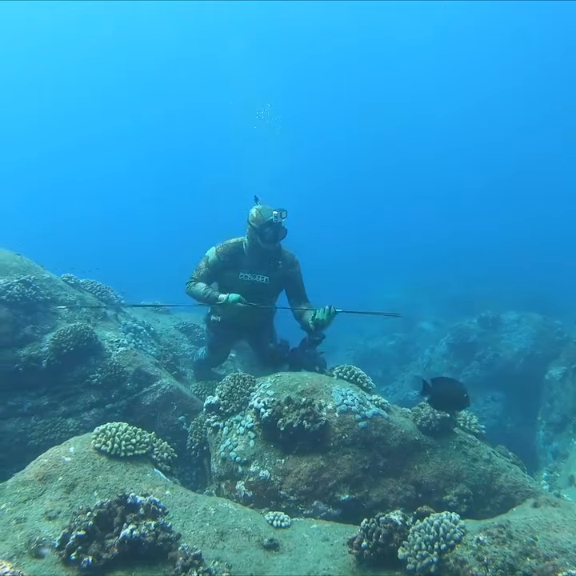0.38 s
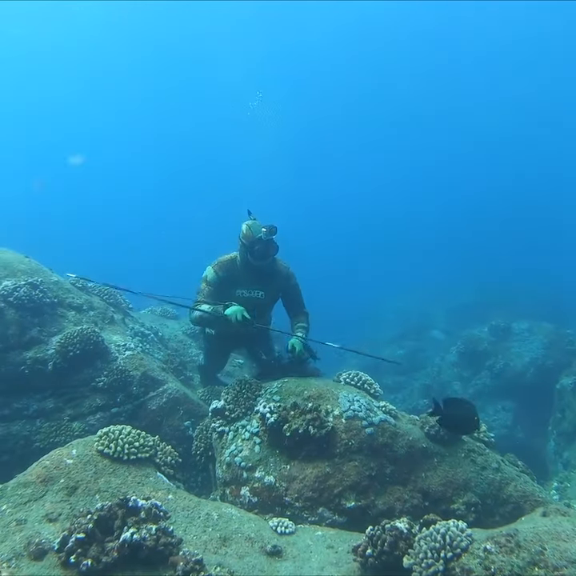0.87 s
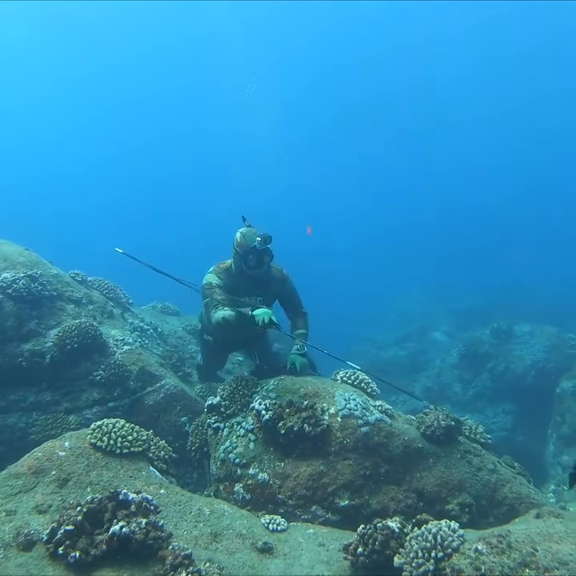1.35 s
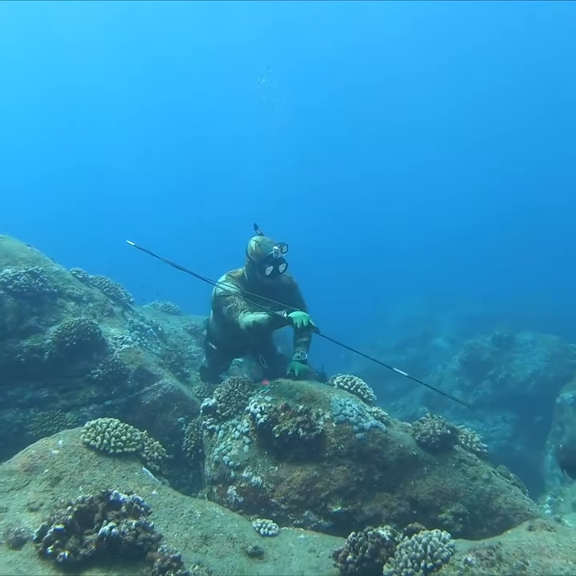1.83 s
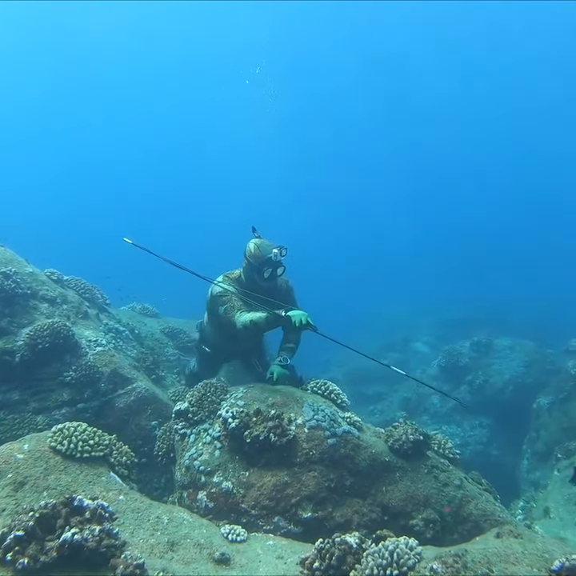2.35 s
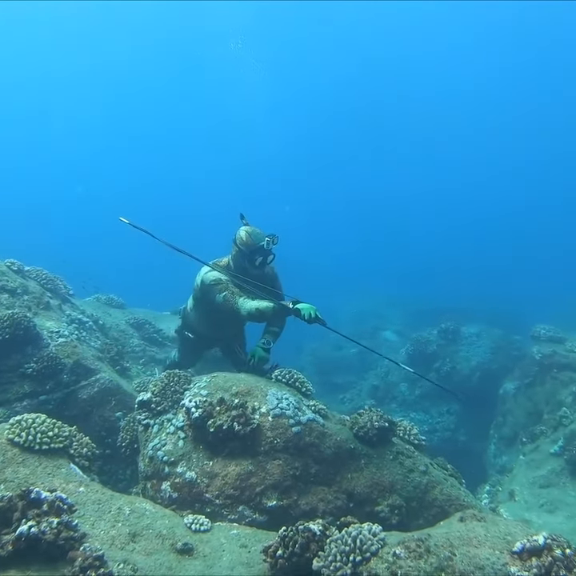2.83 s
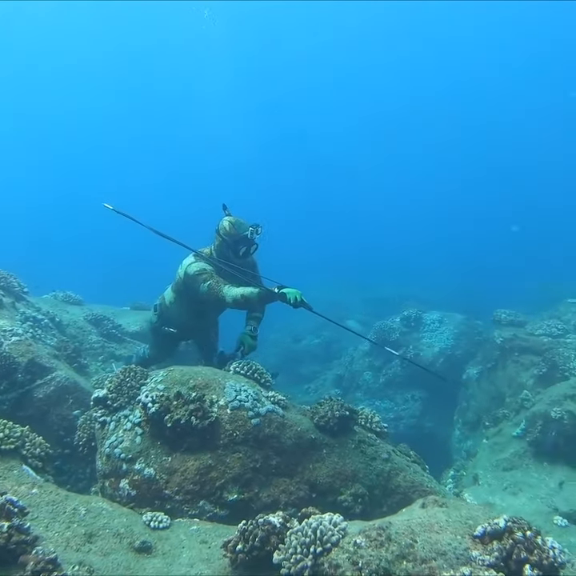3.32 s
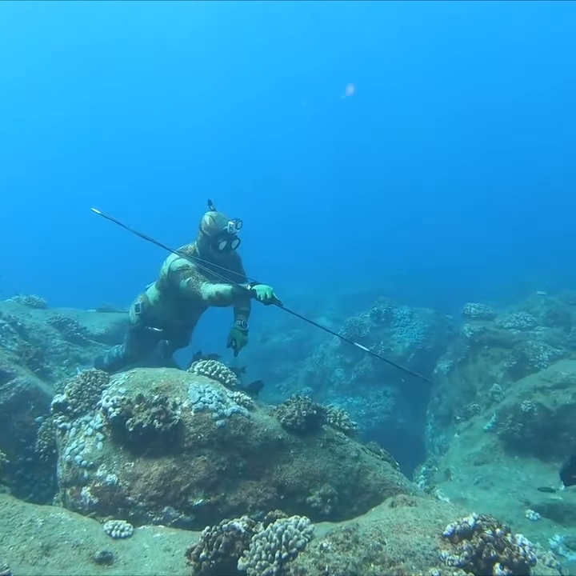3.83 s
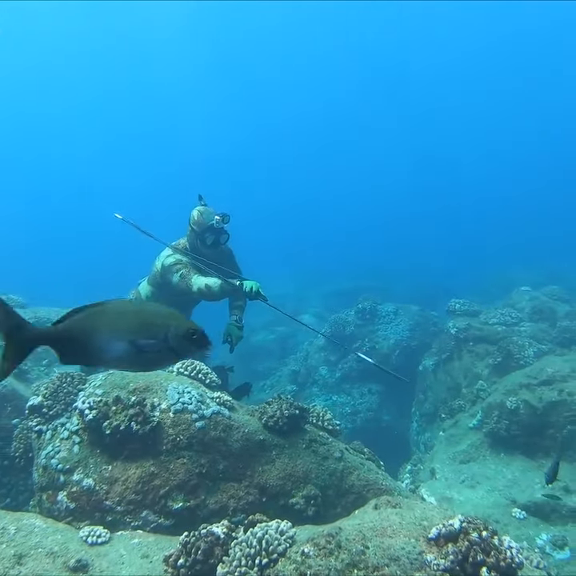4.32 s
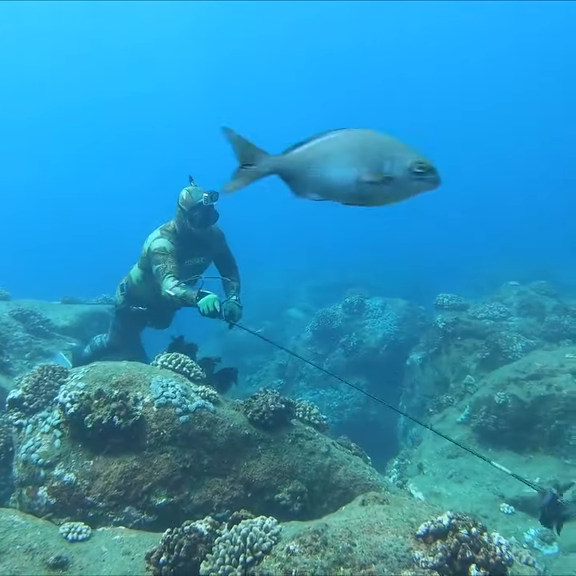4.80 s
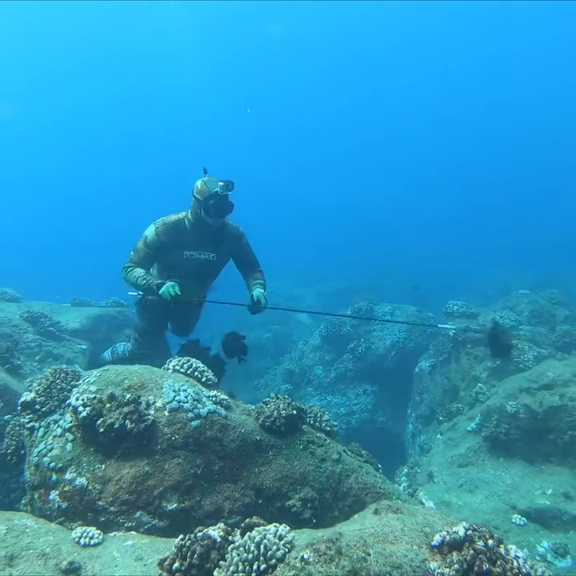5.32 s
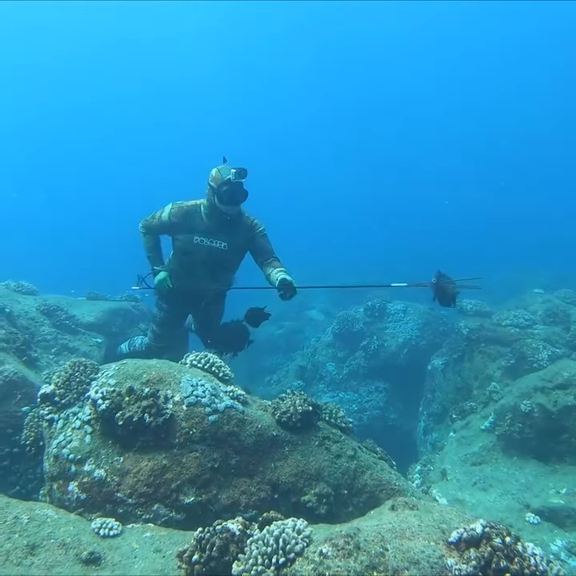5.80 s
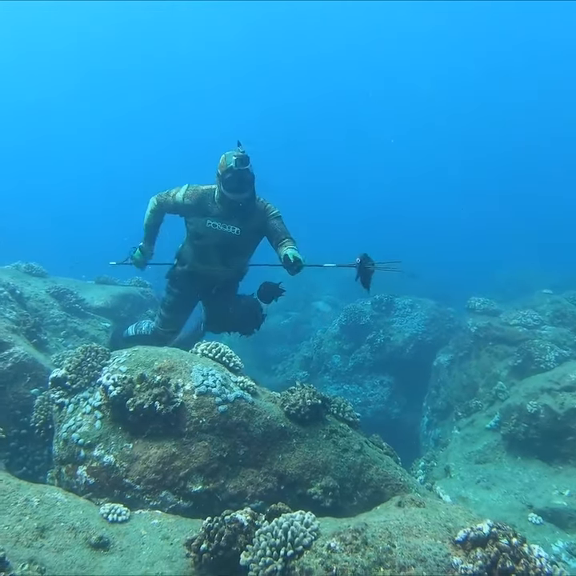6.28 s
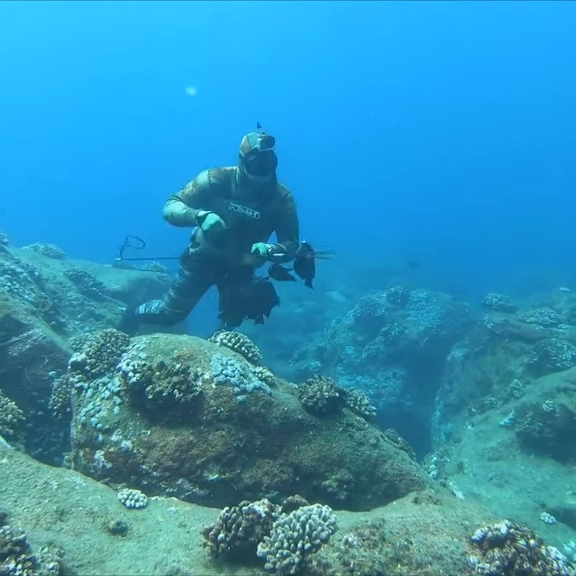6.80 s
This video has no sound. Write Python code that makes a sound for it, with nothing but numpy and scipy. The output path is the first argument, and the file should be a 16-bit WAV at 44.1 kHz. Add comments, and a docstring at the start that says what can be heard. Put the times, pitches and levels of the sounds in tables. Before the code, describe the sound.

Stereo underwater sound on a rocky reef, heard through a sealed, resonant camera housing. From 0 s a wavering hiss of distant snapping shrimp carries dense, clumpy crackle, with sharper clicks, one bright at 0.4 s, over a weak, lumpy water rumble. Dull hollow knocks of gear and rock come around 0.9 to 1.15 s, 2.1 to 2.6 s and 3.4 s, with small pops and low thumps between; a thump swells near 3.25 s. At about 4.5 s the spear is let go: a hard, woody triple slap within 0.02 s, stronger on the right, followed by deep thumps and a strong snap near 4.66 s, with short rock echoes. Everything suddenly ducks, treble most briefly, then recovers over roughly two seconds. Crackle returns as subdued knocks and thumps cluster at 5.1 to 5.6 s, with others around 6.1, 6.3 and 6.8 s.

```python
"""Reef from a sealed housing

Under water, heard through two microphone ports of a camera housing. Shrimp crackle (noise and
filtered clicks) rings the housing modes; gear knocks, water thumps and pops are short tone bursts
with rock echoes, over a band-noise surge. A pole spear is let go with a sharp triple slap and the
gain control ducks everything, then slowly recovers."""
import sys
import numpy as np
from scipy import signal
from scipy.fft import rfft, irfft, next_fast_len
from scipy.io import wavfile

SR = 44100
rng = np.random.default_rng(int(sys.argv[2]) if len(sys.argv) > 2 else 0)


def to_linear_factor(level_db):
    """Convert decibel levels (scalar or array-like) to linear amplitude factors."""
    exponent = np.asarray(level_db, float) / 20
    return 10 ** exponent


def transcribe(signal):
    """Save signal, clipped to [-1, 1], as a 16-bit WAV file at the path in sys.argv[1]."""
    frames = np.atleast_2d(signal).T
    limited = np.clip(frames, -1, 1)
    pcm = np.round(limited * 32767).astype(np.int16)
    wavfile.write(sys.argv[1], SR, pcm)


N = 304731
DIRECTIONS, PLACES = 8, 4  # of the shrimp, of the blows: each has its own echoes


def evened(x):
    """Scale to unit rms."""
    return x / np.sqrt(np.mean(x ** 2))


def add(mix, start_s, sound):
    """Mix a sound in from start_s, cut at the end."""
    part = mix[..., round(start_s * SR):][..., :sound.shape[-1]]
    part += sound[..., :part.shape[-1]]


def band(x, order, low_hz, high_hz):
    """Butterworth band-pass."""
    return signal.sosfilt(signal.butter(order, [low_hz, high_hz], "band", fs=SR, output="sos"), x)


def wander(size, top_hz):
    """Slow chance: unit-rms noise, falling off above top_hz."""
    n = next_fast_len(N)
    spectrum = rfft(rng.standard_normal((size, n)))
    rolloff = 1 + (np.fft.rfftfreq(n, 1 / SR) / top_hz) ** 2
    return evened(irfft(spectrum / rolloff, n)[:, :N])


def burst(out, peak_s, level_db, hz, cycles):
    """A few cycles that swell, peak at peak_s and die a little slower."""
    rise_s = cycles / hz / 1.49
    u = np.arange(3 * rise_s * SR) / SR / rise_s  # 1 at the peak
    envelope = (u * np.exp(1 - u)) ** 8
    tone = np.cos(2 * np.pi * hz * rise_s * (u - 1))
    add(out, peak_s - rise_s, to_linear_factor(level_db) * envelope * tone)


# housing modes: (frequency [Hz], width [Hz], left level [dB], right level [dB],
# right phase [rad], scatter with direction [0-1])
HOUSING_MODES = [(555, 181, -15, -9.5, -0.05, 0.86), (710, 131, -10.5, -2, -0.04, 0),
                 (830, 116, -15, -5, 1, 0.1), (1021, 96, -11.5, -10.5, -3, 0.58),
                 (1431, 115, -7.5, -28.5, 2, 0.5), (1568, 114, -23, -10, -0.5, 0),
                 (1780, 127, -13, -11, -1.35, 1), (2154, 180, -11.5, -9.5, 3.5, 0.01),
                 (2607, 295, -6.5, -4.5, 0, 0.41), (3133, 1010, -8, -8, 0.0453, 0.22),
                 (3970, 1580, -18.5, -21.5, 0.15, 0.39), (5030, 650, -14, -16, -2.5, 0.52),
                 (5715, 650, -14, -15, -0.2, 0.5), (7024, 780, -17, -25.5, 0.1, 0.43),
                 (7190, 760, -19, -18, 0.5, 0.84), (8260, 1780, -23.5, -21.5, -0.36, 0.57),
                 (9900, 1800, -34.5, -29.5, 2.5, 0.63), (10100, 400, -24.5, -23.5, 3.5, 1),
                 (14400, 8500, -32.5, -42, -1.5, 0.17)]


def housing():
    """Response at both ports for each direction: the same modes, driven a little differently."""
    hz, width_hz, left_db, right_db, phase_rad, scatter = np.transpose(HOUSING_MODES)[..., None]
    modes = len(HOUSING_MODES)
    t = np.arange(2048) / SR
    a, b = rng.standard_normal((DIRECTIONS, 2, modes, 2, 1)).transpose(3, 0, 1, 2, 4)
    varied = 1 + scatter * (a + 1j * b)
    varied /= np.sqrt(np.mean(abs(varied) ** 2, 0))  # over all directions each mode keeps its strength
    drive = np.array([to_linear_factor(left_db), to_linear_factor(right_db) * np.exp(1j * phase_rad)]) * varied
    alternate = (-1) ** np.arange(modes)[:, None]  # neighbours in opposite sign leave no deep notch
    decay = np.exp((2j * np.pi * hz - np.pi * abs(width_hz)) * t)
    rings = (alternate * drive * width_hz * decay).imag.sum(2)
    # a stiff shell passes no bass
    rings = signal.sosfilt(signal.butter(4, 450, "high", fs=SR, output="sos"), rings)
    return rings / abs(rings.mean(1)).max(1)[:, None, None]


# echo decay off rock: (frequency [Hz], t60 [s])
REEF_DECAY = [(700, 0.16), (3000, 0.071), (10000, 0.027)]


def reef(x, tails, wet_db):
    """Echoes: random taps, each band dying at its own speed."""
    hz, t, taps = signal.stft(rng.standard_normal((tails, 8192)), SR, nperseg=128)
    decay_hz, decay_s = np.transpose(REEF_DECAY)
    t60_s = np.interp(np.log(hz + 1), np.log(decay_hz), decay_s)
    tail = signal.istft(taps * to_linear_factor(-60 * t / t60_s[:, None]), SR, nperseg=128)[1]
    tail[:, :round(.003 * SR)] = 0  # the nearest rock is a few metres off
    tail *= to_linear_factor(wet_db) / np.linalg.norm(tail, axis=1, keepdims=True)
    return x + signal.oaconvolve(x, tail, axes=1)[:, :N]


# swells of the far reef above its calm: (time of peak [s], level [dB])
SWELLS = [(0.0, 6.4), (0.3, 4.2), (0.54, 3.4), (1.308, 7.7), (2.14, 5.1), (2.55, 1.2), (2.9, 3.3),
          (3.13, 4.2), (3.66, 3.9), (4.35, 4.4), (4.68, 2.2), (4.95, 6.6), (5.25, 6.5), (5.62, 6.5),
          (6.0, 4.6), (6.32, 4.4), (6.9, 2.6)]


def far_shrimp(calm_db=-34.5, flurry_s=0.081, hiss_db=-13, flicker_db=3.5,
               crackle_db=2.0, per_s=110, spread_db=4.5, clump=.9, smear_s=0.001,
               band_ratio=2.38, dull_hz=1500, bright_hz=11000, bright_db=-3):
    """Countless far snaps merge to a hiss; nearer ones crackle in clumps, each direction in its own band."""
    t = np.arange(N) / SR
    swell_db = sum(db * np.exp(-((t - s) / flurry_s) ** 2 / 2) for s, db in SWELLS)
    busy = to_linear_factor(calm_db + swell_db)
    hiss = rng.standard_normal((DIRECTIONS, N)) * to_linear_factor(hiss_db + flicker_db * wander(DIRECTIONS, 42))

    fires = rng.random((DIRECTIONS, N)) < per_s / SR * np.exp(clump * wander(1, 8))
    size = to_linear_factor(spread_db * np.minimum(rng.exponential(1, fires.shape), 3.5))
    clicks = evened(fires * size * rng.choice([-1., 1.], fires.shape))
    # scattered on the way, a click arrives spread out
    smear = rng.standard_normal((DIRECTIONS, 300)) * np.hanning(300)
    smear *= np.exp(-np.arange(300) / SR / smear_s)
    clicks = evened(signal.oaconvolve(clicks, smear, axes=1)[:, :N])

    edges_hz = np.geomspace(dull_hz, bright_hz, DIRECTIONS)
    crackle = np.array([band(c, 2, hz / band_ratio, hz) for hz, c in zip(edges_hz, clicks)])
    tilt_db = np.linspace(0, bright_db, DIRECTIONS)[:, None]
    return busy * (hiss + to_linear_factor(crackle_db + tilt_db) * crackle)


def surge(rumble_db=-61, top_hz=75, sway_db=-60.5, sway_hz=175, width_hz=45, lumpy_db=6, apart_db=-10):
    """Lumpy rumble of water moving round the housing, which sways on its mount; nearly alike at both ports."""
    shared = rng.standard_normal((2, 1, N))
    push, swing = shared + to_linear_factor(apart_db) * rng.standard_normal((2, 2, N))
    rumble = band(push, 2, 36, top_hz)
    sway = band(swing, 2, sway_hz - width_hz, sway_hz + width_hz)
    lumps = to_linear_factor(lumpy_db * wander(2, 7.7))
    return to_linear_factor(rumble_db) * evened(rumble) * lumps[0] + to_linear_factor(sway_db) * evened(sway) * lumps[1]


# loudest shrimp snaps: (time [s], level [dB], fizz level re click [dB])
LOUD_SNAPS = [(0.0174, -13.5, -9), (0.042, -18, 6.5), (0.098, -14, -23), (0.2232, -14.5, -29),
              (0.334, -18, 4), (0.344, -34, -15), (0.3599, -15, -11), (0.3999, -2.5, -6),
              (0.479, -19.5, -27), (0.5125, -16, -5), (0.5441, -16, -9), (0.6063, -20, -19),
              (0.7899, -28, -21), (0.9922, -15.5, -16), (1.0498, -22, -12), (1.0693, -14.5, -7),
              (1.2182, -16.5, -10), (1.3105, -15, -16), (1.3503, -12.5, -26), (1.418, -9, -23),
              (1.5247, -16.5, -8), (1.5636, -15.5, -9.5), (1.5943, -15, -26), (1.6056, -17, -23),
              (1.6415, -23.5, 5), (1.7437, -21, 3), (1.781, -16.5, -4.5), (1.8899, -13.5, -5),
              (1.9736, -15.5, -17), (2.029, -14, -2), (2.04, -14, -0.5), (2.1121, -17, -6),
              (2.1186, -12.5, -9), (2.1312, -8.5, -8), (2.1398, -15, -27), (2.2018, -20, -20),
              (2.4842, -22, -19), (2.5073, -14.5, -31), (2.5467, -13.5, -10), (2.7485, -19, -9),
              (2.779, -17.5, -1), (2.8208, -18, -12), (2.8592, -19.5, -22), (2.9387, -13, -6),
              (3.1271, -24, -28), (3.2613, -18.5, -8), (3.2957, -19.5, 0), (3.3187, -9, -10.5),
              (3.4504, -11.5, -12), (3.4863, -18.5, -2), (3.5432, -14, -4.5), (3.5495, -22, -18),
              (3.5642, -20, 9), (3.8706, -11.5, -7), (3.9482, -20, 6), (3.996, -17.5, 13.5),
              (4.028, -8.5, -31), (4.0353, -17, -5), (4.393, -15, -14), (4.3977, -6.5, -32),
              (4.4501, -14.5, -29), (4.4767, -15.5, -28), (4.5158, -14.5, -21), (4.6617, 6.5, -1),
              (4.778, -13.5, -3), (4.8084, -7.5, -7), (4.8137, -7, -13), (4.851, -16, -8),
              (5.1877, -13.5, -12), (5.252, -20, -4), (5.264, -12, -4), (5.2734, -11, -8), (5.5027, -9, -7),
              (5.6652, -15, -3.5), (5.7647, -17.5, 7), (5.7797, -15.5, -1), (5.9159, -6.5, -11),
              (5.998, -13, -3), (6.0788, -15.5, 2.5), (6.224, -17, -2), (6.2379, -18.5, 0),
              (6.291, -24, -8), (6.3098, -22, -15), (6.328, -19.5, -2), (6.392, -31, 6.5),
              (6.499, -18, -10), (6.5085, -13, -12), (6.6214, -12, -5.5), (6.628, -19, -5),
              (6.7229, -21, -8), (6.8132, -13, -15), (6.8512, -14, -15)]


def snaps(low_hz=2000, high_hz=4100, top_hz=10500, low_db=-3, ragged_db=-6, ragged_s=0.00128, fizz_s=.001):
    """A collapsing bubble: a rounded click with a ragged wake, whose treble trails off in a short fizz."""
    out, click = np.zeros((DIRECTIONS, N)), signal.unit_impulse(256)
    t = np.arange(256) / SR
    low = signal.lfilter(*signal.butter(2, low_hz, fs=SR), click)
    middle = band(click, 4, low_hz, high_hz)

    fizz = rng.standard_normal((len(LOUD_SNAPS), 256)) * np.arange(256) ** .5 * np.exp(-t / fizz_s)
    fizz /= np.linalg.norm(fizz, axis=1, keepdims=True)
    high = band(fizz, 2, high_hz, top_hz)

    fade = np.exp(-t / ragged_s)
    fade /= np.linalg.norm(fade)
    wake = click + to_linear_factor(ragged_db) * fade * rng.standard_normal(fizz.shape)
    body = signal.oaconvolve(wake, [middle + to_linear_factor(low_db) * low], axes=1)[:, :256]
    for k, (s, level_db, fizz_db) in enumerate(LOUD_SNAPS):
        add(out[k % DIRECTIONS], s, to_linear_factor(level_db) * (body[k] + to_linear_factor(fizz_db) * high[k]))
    return out


# mid-pitched pops, some alone, many on a loud snap: (time [s], level [dB], frequency [Hz])
MID_POPS = [(0.0179, -17.5, 1680), (0.093, -23, 1650), (0.2692, -26.5, 1590), (0.3334, -24.5, 1880),
            (0.4, -29, 1690), (1.0177, -28.5, 1510), (1.605, -28, 1670), (2.1315, -18.5, 1620),
            (2.543, -24, 1560), (3.3186, -23, 1660), (3.997, -26, 1870), (4.028, -18.5, 1580),
            (4.3938, -24, 1780), (4.4767, -27, 1590), (4.522, -18.5, 1310), (4.6613, -17, 1600),
            (4.988, -30, 1085), (5.916, -23.5, 1760), (6.0708, -29, 1550), (6.51, -20.5, 1580),
            (6.6087, -31, 1840)]


def pops(cycles=4.25, right_gain=0.66):
    """Each pop rings a few cycles, mostly at the left port."""
    out = np.zeros((1, N))
    for row in MID_POPS:
        burst(out, *row, cycles)
    return reef(out, tails=1, wet_db=-3.5) * [[2 - right_gain], [right_gain]]


# low thumps of water on the housing: (time [s], level [dB], frequency [Hz], length [cycles])
WATER_THUMPS = [(0.0694, -30.5, 161, 0.96), (0.4915, -30.5, 181, 2.2), (1.1, -25, 216, 1.8),
                (2.212, -30.5, 185, 1.8), (2.665, -29.5, 80.5, 1.1), (3.059, -31, 144, 0.71),
                (3.253, -20.5, 177.5, 4), (3.4096, -25.5, 188, 2.1), (3.902, -34, 155, 1.7),
                (4.0716, -34.5, 180, 1.1), (4.5274, -14.5, 187, 3.5), (4.575, -21, 175, 2.6),
                (4.6107, -7, 155, 1.2), (4.6413, -11.5, 172, 9.3), (4.695, -21, 180, 2.1),
                (4.7402, -12.5, 150, 1.3), (4.7935, -16.5, 209, 1.3), (5.035, -33.5, 108, 1.7),
                (5.16, -26.5, 146, 1.1), (5.2983, -19, 198, 2), (5.3673, -22.5, 215, 3.2),
                (5.4063, -17, 145, 0.9), (6.069, -18, 152, 2.3), (6.1205, -29.5, 148, 1.1),
                (6.789, -23.5, 99, 4.7), (6.848, -20, 139, 1.6)]


def thumps(small_count=80, small_db=-46, spread_db=9):
    """Jolts move the housing as a whole, alike at both ports; many small ones fall among the large."""
    out = np.zeros((PLACES, N))
    for k, row in enumerate(WATER_THUMPS):
        burst(out[k % PLACES], *row)
    for k, (when, size, pitch) in enumerate(rng.random((small_count, 3))):
        peak_s = 0.051 + when * N / SR
        hz = 50 * 4.5 ** pitch ** .5  # 50-225 Hz, mostly high
        burst(out[k % PLACES], peak_s, small_db + spread_db * size ** 2, hz, cycles=1.12)
    return reef(out, tails=PLACES, wet_db=-14.5).sum(0)


def blows(rows, pans_db):
    """Blows ring the boom of the housing, panned between ports (positive = left), with echoes by place."""
    out = np.zeros((PLACES, 2, N))
    for k, ((s, level_db, hz, cycles), pan_db) in enumerate(zip(rows, pans_db)):
        ports = to_linear_factor([[pan_db / 2], [-pan_db / 2]])
        burst(out[k % PLACES], s, level_db + 20 * np.log10(ports / ports.mean()), hz, cycles)
    return sum(reef(place, tails=1, wet_db=-11.0) for place in out)


# dull knocks of gear and rock: (time of peak [s], level [dB], frequency [Hz], length [cycles])
GEAR_KNOCKS = [(0.308, -32, 765, 3.7), (0.9387, -16, 670, 4.3), (0.954, -26.5, 640, 2.7),
               (1.0975, -21, 600, 3), (1.12, -17.5, 570, 2), (1.1452, -15.5, 630, 3.5),
               (2.1341, -23, 770, 6.4), (2.2092, -18, 637, 4.9), (2.313, -21.5, 675, 2.9),
               (2.5571, -16, 747, 2.9), (2.8317, -23.5, 740, 3.8), (3.32, -22.5, 760, 3.9),
               (3.4064, -12.5, 657, 4.9), (3.4763, -16.5, 685, 3.4), (4.0305, -27, 805, 6.7),
               (4.203, -28.5, 760, 5.6), (4.663, -16, 710, 1.5), (4.7413, -13, 583, 2.1),
               (4.861, -22.5, 660, 4.5), (5.138, -22, 610, 2.5), (5.29, -14, 750, 3.6),
               (5.308, -19.5, 720, 2.7), (5.3659, -15.5, 700, 3.4), (5.4096, -16.5, 650, 4.4),
               (5.463, -22.5, 706, 3.5), (5.613, -24.5, 596, 3.6), (5.9174, -21.5, 785, 6.4),
               (6.327, -22.5, 736, 15)]


def knocks(even_hz=420, pan_db_per_hz=-0.022):
    """Gear and rock knock dully; the higher a knock rings, the more it favours the right port."""
    return blows(GEAR_KNOCKS, [pan_db_per_hz * (row[2] - even_hz) for row in GEAR_KNOCKS])


# slaps of the spear's rubber: (time of peak [s], level [dB], frequency [Hz], length [cycles])
SPEAR_SLAPS = [(4.5035, -21.5, 760, 5), (4.5128, -9, 726, 10.2), (4.5226, 1.5, 720, 4.04)]


def spear(pan_db=-5):
    """The spear let go: its rubber slaps three times, louder at the right port."""
    return blows(SPEAR_SLAPS, [pan_db] * len(SPEAR_SLAPS))


def scene():
    """Every direction of the reef rings the housing in its own way; the rest reaches the ports directly."""
    rings = housing()
    far = reef(far_shrimp() / np.linalg.norm(rings.mean(1)), tails=DIRECTIONS, wet_db=-12)
    water = far + reef(snaps(), tails=DIRECTIONS, wet_db=-12)
    ports = signal.oaconvolve(water[:, None], rings, axes=2)[..., :N].sum(0)
    return ports + surge() + pops() + thumps() + knocks() + spear()


def top_cut(x):
    """Nothing passes above the cut-off."""
    return signal.sosfilt(signal.butter(12, 16490, fs=SR, output="sos"), x)


def record(dry):
    """Gain control keyed on the boom: a loud blow ducks all for seconds, the treble further for a moment."""
    boom = signal.lfilter(*signal.butter(2, [450, 1000], "band", fs=SR), dry[1])
    power = signal.lfilter([1 / 220], [1, 1 / 220 - 1], boom ** 2)  # 220-sample (5 ms) average
    over_db = 10 * np.log10(power + 1e-12) + 13  # threshold -13 dB
    t, gains = np.arange(N) / SR, []
    # all, then treble: depth [dB], recovery [dB/s], fall time [s]
    for depth_db, db_per_s, fall_s in ((17.4, 8.96, 0.02), (18, 150, 0.0017)):
        pull_db = np.clip(6 * over_db, 0, depth_db)
        held_db = np.maximum.accumulate(pull_db + db_per_s * t) - db_per_s * t
        step = 1 / (fall_s * SR)
        gains.append(to_linear_factor(-signal.lfilter([step], [1, step - 1], held_db)))
    bass = signal.sosfiltfilt(signal.butter(2, 1000, fs=SR, output="sos"), dry)
    ducked = gains[0] * (bass + gains[1] * (dry - bass))
    dulled = signal.sosfilt(signal.butter(5, 13000, fs=SR, output="sos"), ducked)
    return top_cut(np.clip(dulled, -1, 1))


dry = scene()
out = record(dry)
transcribe(out)
```